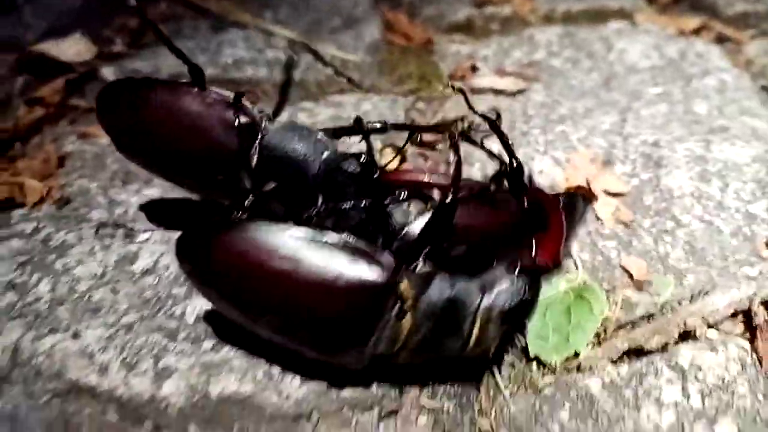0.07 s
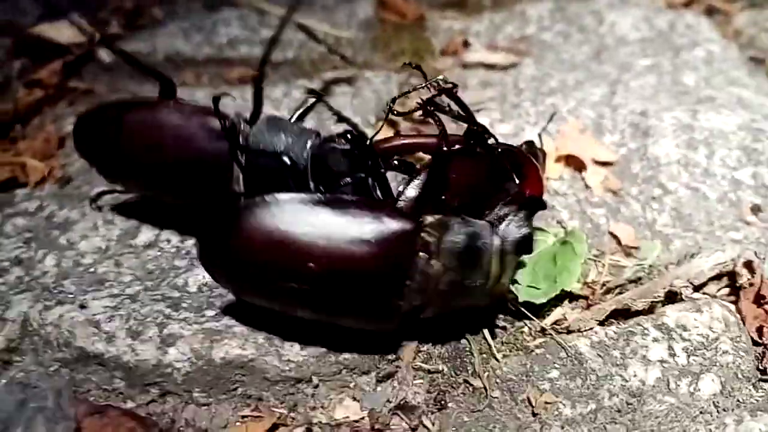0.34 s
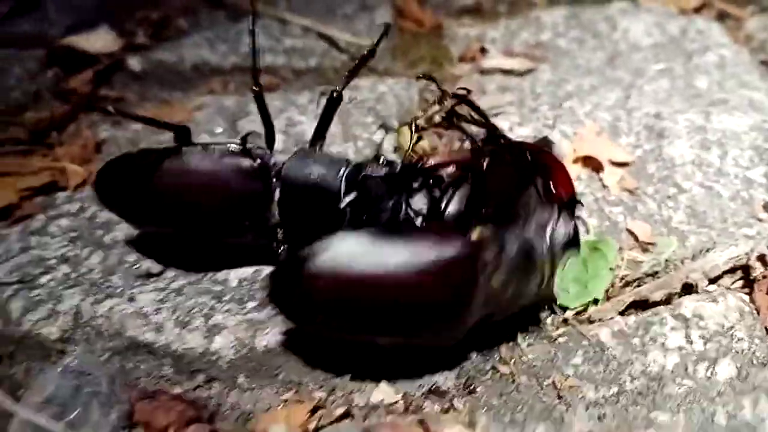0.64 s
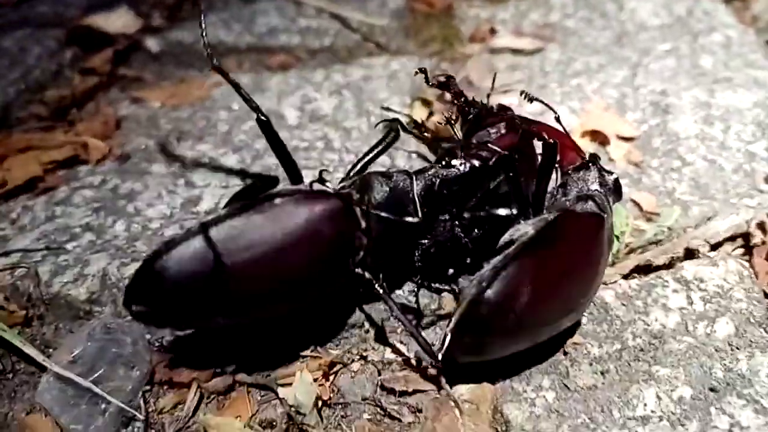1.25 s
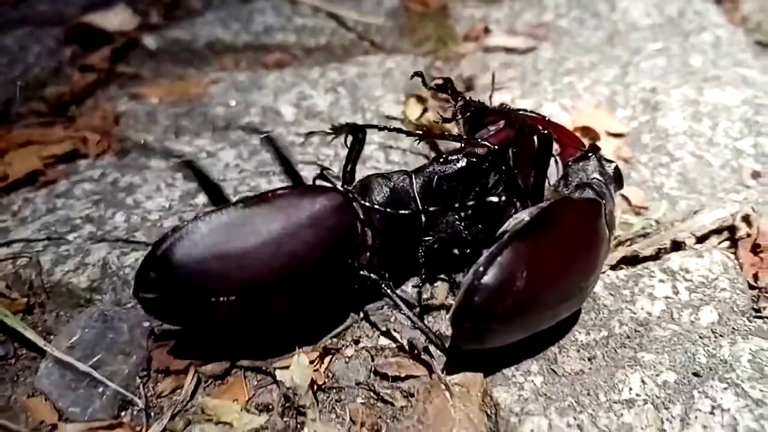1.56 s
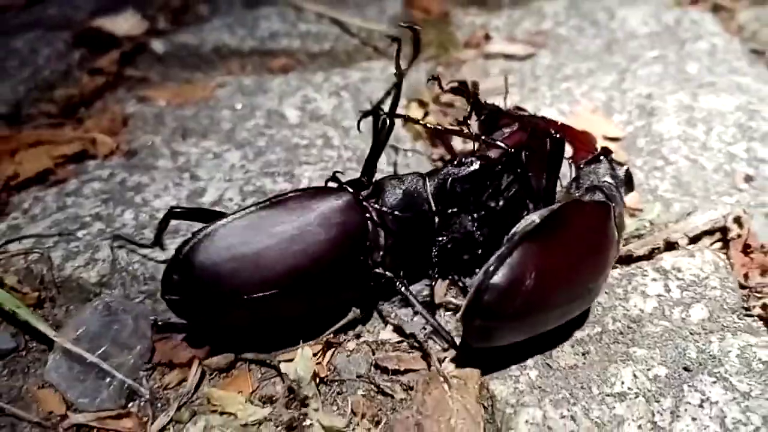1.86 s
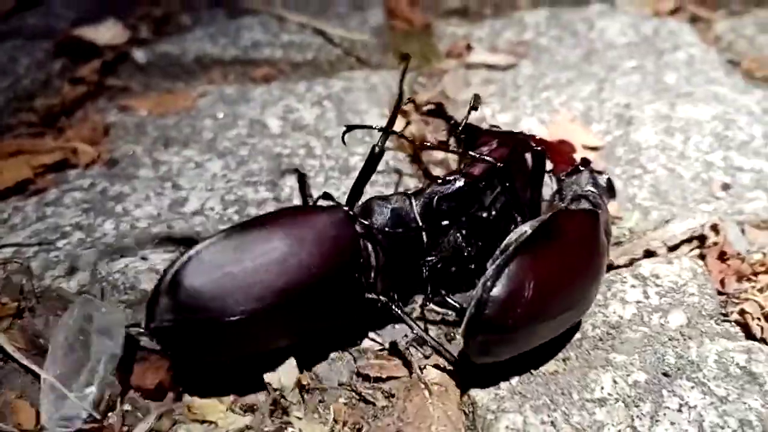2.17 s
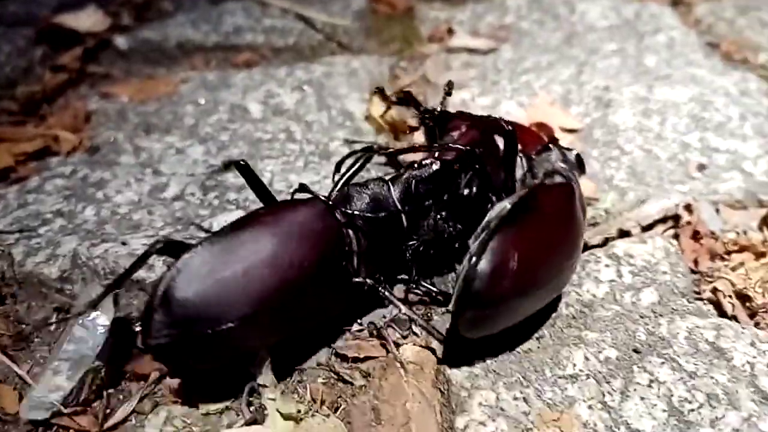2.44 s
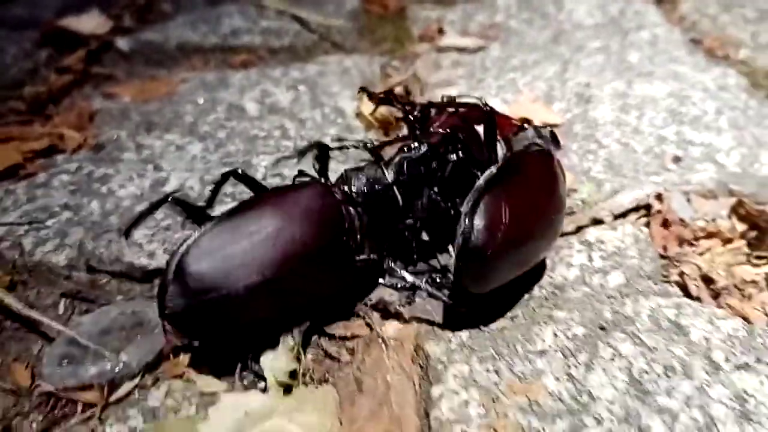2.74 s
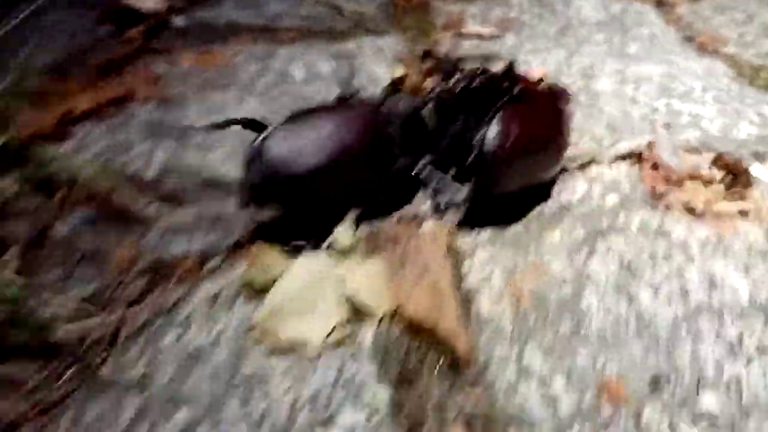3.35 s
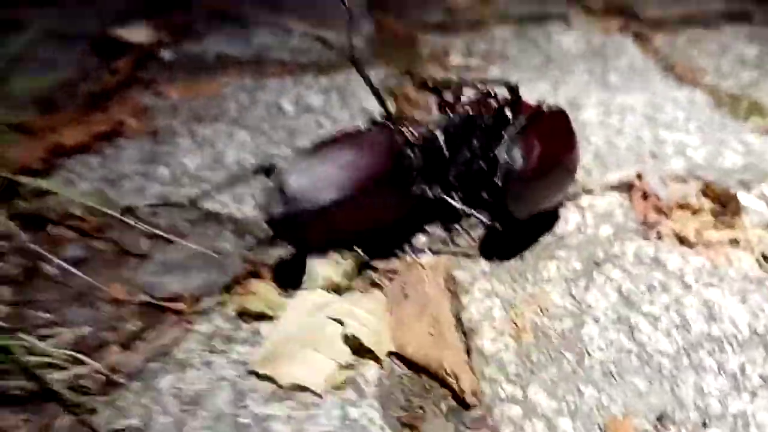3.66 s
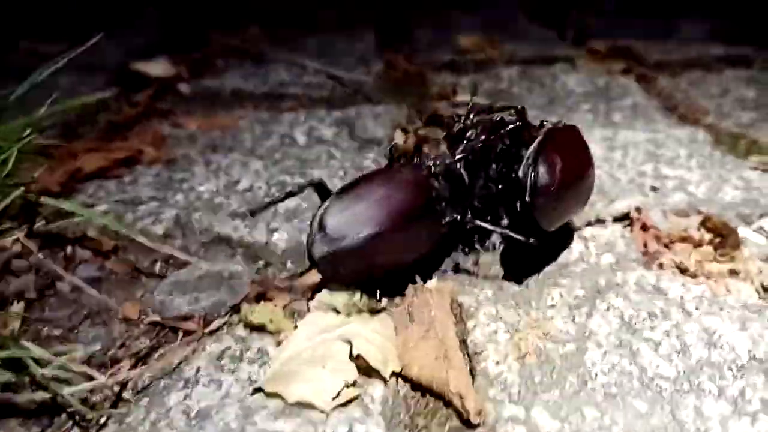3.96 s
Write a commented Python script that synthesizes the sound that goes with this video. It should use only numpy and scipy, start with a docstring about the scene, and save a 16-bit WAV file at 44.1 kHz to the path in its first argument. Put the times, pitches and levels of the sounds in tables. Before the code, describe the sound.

Dry, scratchy scraping of beetles scuffling on stone comes in uneven bursts with sharp ticks and dull knocks. It pauses, then returns harder and fades. The sound is very close and mostly on the right, over faint outdoor air.

```python
"""Dry handling sounds very near the right microphone, perhaps fingers on the recorder or beetles scuffling.
First come uneven scrapes, each a swarm of tiny slips, with sharp ticks, dull knocks and a hollow rub.
Near 2 seconds there is a lull. The fiercest burst starts around 3 seconds and dies down before the end.
All along, the right microphone's opening rings near 15 kHz with the contact, the left hears a duller
rustle, and both pick up faint outdoor air and light puffs of wind."""
import sys
import numpy as np
from scipy import signal
from scipy.fft import rfft, irfft
from scipy.io import wavfile
from scipy.ndimage import uniform_filter1d

SR = 44100
rng = np.random.default_rng(int(sys.argv[2]) if len(sys.argv) > 2 else 0)


def store_wav(level_fs):
    """Save 16-bit WAV to argv[1]."""
    pcm = np.round(np.clip(np.atleast_2d(level_fs), -1, 1) * 32767)
    wavfile.write(sys.argv[1], SR, pcm.T.astype(np.int16))


N = 176400  # 4 seconds

# How loud the scraping is. Each row: time in seconds, hiss level in dB, low rub level in dB.
SCRAPE_LEVELS = [(0.0, -52, -56.5), (0.18, -46.5, -51), (0.34, -64.5, -69), (0.38, -61, -66),
                 (0.4, -48.5, -59.5), (0.5, -52.5, -59.5), (0.52, -55, -57), (0.54, -44.5, -53.5),
                 (0.58, -50.5, -54.5), (0.7, -52.5, -53), (0.78, -54, -61), (0.825, -57.5, -59.5),
                 (0.84, -48, -53.5), (0.9, -49, -59), (0.93, -57.5, -57.5), (1.02, -66.5, -66.5),
                 (1.07, -59, -62.5), (1.14, -54, -56), (1.21, -54, -59), (1.24, -50.5, -57),
                 (1.28, -53, -60.5), (1.38, -55.5, -59), (1.41, -59, -63.5), (1.55, -51.5, -58),
                 (1.65, -55.5, -59.5), (1.67, -62, -64), (1.86, -72.5, -66), (1.93, -63, -71),
                 (2.02, -71, -68), (2.07, -60, -71), (2.09, -81, -66), (2.14, -62, -66),
                 (2.18, -80.5, -68.5), (2.29, -52.5, -57), (2.42, -51, -53), (2.52, -64, -62.5),
                 (2.55, -53, -56), (2.82, -48, -53.5), (2.85, -60, -62), (2.875, -47.5, -55),
                 (2.92, -46.5, -58), (2.97, -44.5, -53), (3.06, -43.5, -55.5), (3.09, -55, -64),
                 (3.13, -60, -64), (3.145, -44.5, -52), (3.175, -52.5, -63), (3.215, -48.5, -65),
                 (3.26, -41.5, -54), (3.29, -49, -62), (3.32, -53.5, -68), (3.365, -38, -49.5),
                 (3.405, -39, -54), (3.44, -40.5, -53), (3.48, -47, -59), (3.5, -42, -58),
                 (3.53, -44.5, -55), (3.62, -41, -55.5), (3.71, -48, -53), (3.745, -64.5, -62.5),
                 (3.79, -54, -58), (3.84, -73, -70), (3.88, -61, -60), (3.91, -68.5, -68),
                 (3.99, -57.5, -62)]
# How much the microphone's opening rings. Each row: time in seconds, level against the hiss in dB.
RING_LEVELS = [(0, -0.5), (0.53, 2.5), (0.66, -4), (1.35, 0.5), (1.9, -5.5), (2.92, -2.5), (3.04, -1),
               (3.14, 0), (3.24, 0), (3.4, -4), (3.49, -5), (3.57, 2), (3.8, -10)]
# Sharp ticks. Each row: time in seconds, then crack level, brightness, thud level, ring level in dB.
TICK_EVENTS = [(0.103, -41.5, -1, -54, -39), (0.164, -36.5, 4, -36, -32), (0.2855, -47.5, 1, -63, -47),
               (0.3604, -38.5, 2, -55, -38), (0.3656, -41, -1, -72, -40), (0.3953, -36.5, 0, -55, -36),
               (0.43, -43, 3, -43, -39), (0.4732, -39, 6, -48.5, -42), (0.5697, -41.5, -3, -55, -46),
               (0.7803, -42, 8, -56, -42), (1.2195, -35.5, -5, -45, -39), (1.2218, -43, -5, -45, -46),
               (1.2709, -33, -7.5, -56, -42), (1.455, -37, 0, -43, -43), (1.501, -53, -3, -56, -39),
               (1.6081, -42, -3, -69, -38), (1.899, -50.5, -2, -70, -66), (2.031, -49.5, -2, -70, -46),
               (2.12, -53, -3, -66, -50), (2.1487, -54, 2, -70, -56), (2.1947, -52.5, 0, -68, -49),
               (2.2691, -46, -6, -72, -52), (2.377, -42, 11, -46.5, -37), (2.7932, -33.5, -6.5, -43.5, -35),
               (2.8767, -36, 2.5, -54, -42), (2.97, -30.5, 4, -38.5, -36), (2.9806, -29, 3, -39, -36),
               (2.9967, -35, 5, -56, -31), (3.036, -37, 4, -58, -33), (3.0416, -32.5, 2, -60, -28),
               (3.1033, -34, -1, -39.5, -44), (3.12, -28, 15, -31.5, -27), (3.1741, -24, 5, -36.5, -28),
               (3.2021, -20, 13.5, -26.5, -29), (3.222, -30, 19, -35.5, -31), (3.229, -44, -1, -60, -22),
               (3.2587, -28.5, 7.5, -37.5, -35), (3.2882, -23, 21, -25, -24.5), (3.306, -40, 8, -57, -33),
               (3.3304, -29, 11, -42, -32), (3.3432, -27.5, 6, -34.5, -30), (3.3637, -33, 7, -49, -36),
               (3.3808, -33.5, 3, -58, -29), (3.386, -37, 1, -37.5, -29), (3.4015, -29.5, 1, -47, -35),
               (3.4072, -25, 7, -57, -30), (3.4609, -28, -6, -35.5, -32), (3.48, -32, 6, -59, -42),
               (3.5032, -28.5, 8, -48, -40), (3.5078, -30, 8, -57, -43), (3.5483, -34, 4, -59, -46),
               (3.5537, -32, -2, -42.5, -38), (3.5865, -38, 0, -42, -35), (3.608, -41, -2, -47, -33),
               (3.6211, -31, 1, -47, -34), (3.659, -38, 9, -49, -43), (3.7495, -48.5, 0, -70, -43),
               (3.7803, -42, 4, -44.5, -68), (3.873, -45.5, 2, -66, -58), (3.8832, -36.5, -0.5, -59, -31),
               (3.9594, -40.5, -4, -58, -44), (3.989, -45.5, 4, -54, -48)]
# Dull knocks. Each row: start in seconds, level in dB, pitch in Hz.
KNOCK_EVENTS = [(0.164, -31.5, 173), (0.1754, -40, 300), (0.4516, -41.5, 400), (0.6737, -38.5, 1160),
                (.7016, -31, 1110), (0.7328, -44.5, 1080), (0.8407, -40, 1260), (0.8818, -40, 730),
                (0.9017, -42, 400), (1.2204, -38, 720), (1.248, -41, 276), (1.2715, -42, 298),
                (1.454, -41, 388), (2.418, -40.5, 686), (2.7932, -35.5, 313), (2.839, -32, 404),
                (3.028, -39.5, 1650), (3.0584, -40.5, 1790), (3.202, -38.5, 135), (3.288, -28, 125)]
# The hollow rub. Each row: time in seconds, level in dB.
HOLLOW_LEVELS = [(0, -77), (.2, -70), (.33, -80), (.58, -62), (1.02, -82), (1.27, -59), (1.42, -63),
                 (1.57, -56.5), (1.75, -72.5), (2.3, -72.5), (2.45, -66), (4, -84)]
# The rustle on the left. Each row: time in seconds, hiss level in dB, low rub level in dB.
RUSTLE_LEVELS = [(0.0, -61, -60.5), (0.19, -61, -56), (0.29, -67.5, -66.5), (0.74, -60.5, -60),
                 (1.04, -73.5, -69), (1.51, -75, -73), (1.56, -63, -72), (1.85, -77, -71),
                 (1.92, -63.5, -75), (2.1, -78.5, -72.5), (2.99, -51.5, -67), (3.1, -60, -61),
                 (3.36, -55.5, -70), (3.63, -56.5, -64), (3.73, -70, -72), (3.99, -69.5, -66.5)]
# Puffs of wind. Each row: time in seconds, level in dB.
WIND_LEVELS = [(0.0, -87), (0.27, -77), (0.45, -98), (0.58, -75), (0.7, -99), (1.15, -84), (1.24, -77),
               (1.35, -88), (1.78, -73), (2.24, -85), (2.33, -70.5), (2.81, -80.5), (3.24, -91),
               (3.99, -79.5)]

# The tone of each sound, from low to high. Each row: frequency in Hz, relative strength in dB.
SOFT_HISS_TONE = [(1200, -23.5), (2200, -9), (3200, -2.5), (4800, -3), (6200, 4), (7600, 1.5), (8700, -1.5),
                  (9600, -2), (11000, -4.5), (12500, -11), (14000, -0.5), (16000, -31)]  # light scraping
HARD_HISS_TONE = [(1200, -19.5), (2200, -13.5), (3200, -4.5), (4800, -4), (6200, 1), (7600, 0.5),
                  (8700, -2.5), (9600, -0.5), (11000, -5), (12500, -8), (14000, -8), (16000, -43)]  # hard scraping
RUB_TONE = [(30, -29), (70, -9.5), (130, -0.5), (300, -1), (600, 1), (1200, -1), (1700, -3.5),
            (2400, -12.5), (4000, -29)]  # the low part of a scrape
RING_TONE = [(12500, -43), (14100, 1), (14700, 8), (15100, 5), (15450, 11), (15800, -6), (16400, -44),
             (17000, -46)]  # the right microphone's opening
CRACK_TONE = [(1500, -29), (2800, -14), (4500, -2), (7000, 6.5), (8600, 3), (9500, 3), (11300, -2),
              (13000, -9), (16000, -32)]  # the bright part of a tick
THUD_TONE = [(25, -28), (60, -6), (200, 0.5), (600, 1.5), (1500, -0.5), (3000, -7.5), (4200, -6.5),
             (5500, -18.5)]  # the low part of a tick
KNOCK_TONE = [(25, -30), (70, 0.5), (1650, -6), (2300, -19), (6000, -26)]  # a dull knock
HOLLOW_TONE = [(100, -24), (200, -7), (300, 0), (430, -2), (560, -15.5), (1000, -41)]  # the hollow rub
FAR_HISS_TONE = [(1500, -3), (2500, -3), (6500, 2.5), (8000, 3), (9800, -11.5), (13000, -25), (15000, -21),
                 (16500, -38)]  # the high part of the left rustle
FAR_RUB_TONE = [(100, -12), (250, 7), (500, -2.5), (750, 6), (1600, 5), (2300, -1.5), (4000, -22)]  # the low part of the left rustle
AIR_TONE = [(30, -12), (80, 10), (150, 5), (650, -6.5), (1050, 9.5), (1600, -1.5), (2500, -11), (6000, -20),
            (11000, -62)]  # outdoor air
WIND_TONE = [(20, -34), (45, -6), (80, -2), (135, 7.5), (180, -9.5), (500, -34)]  # wind on a microphone

SLIPS_PER_SECOND, SLIP_FADE_S, SLIP_SPREAD_DB = 1500, 0.00036, 5.5


def scraping():
    """Tiny slips make a hiss, a low rub and a ring in the microphone. Pressing harder adds grit."""
    grit_from_db, grit_per_db, hard_from_db = -47, 0.15, -49
    level = curve(SCRAPE_LEVELS)
    grain = slips(SLIP_SPREAD_DB + grit_per_db * np.maximum(level - grit_from_db, 0))
    hard = np.clip((level - hard_from_db) / 0.5, 0, 1)  # 0 for a light scrape, 1 for a hard one
    friction = grain * patchy_noise()
    hiss = (1 - hard) * colour(friction, SOFT_HISS_TONE) + hard * colour(friction, HARD_HISS_TONE)
    smoother_grain = grain ** 0.41
    rub = colour(smoother_grain * patchy_noise() * flutter(db=2, hz=67), RUB_TONE)
    ring = colour(grain * patchy_noise() * flutter(db=2.5, hz=120), RING_TONE)
    return (hiss * gain(level + 2)
            + rub * gain(curve(SCRAPE_LEVELS, column=2) - 0.5)
            + ring * gain(level + curve(RING_LEVELS)))


def slips(spread_db):
    """The jumpy loudness of many tiny slips, most small and a few large, over smooth sliding."""
    smooth_share = 0.2
    sizes = gain(spread_db * np.minimum(rng.exponential(1, N), 3.38))  # capped so none is huge
    slipping = rng.random(N) < SLIPS_PER_SECOND / SR
    t = np.arange(-200, 201) / SR
    one_slip = np.exp(-2 * abs(t) / SLIP_FADE_S)
    power = abs(signal.oaconvolve((sizes * slipping) ** 2, one_slip, "same"))
    power /= abs(uniform_filter1d(power, size=2600)) + 1e-9  # keep the average steady
    return np.sqrt(smooth_share + (1 - smooth_share) * power)


def patchy_noise():
    """Each moment of contact has its own tone: noise with random louder and softer patches."""
    patch_db = 2.4
    grid = signal.stft(noise(), nperseg=512)[2]  # the noise split up by frequency and time
    patches = uniform_filter1d(rng.standard_normal(grid.shape), size=4, axis=0)
    patches = uniform_filter1d(patches, size=4, axis=1)
    grid = grid * gain(patch_db * normalise(patches))
    return normalise(signal.istft(grid, nperseg=512)[1][:N])


def ticks():
    """Something catches and lets go: a burst about a millisecond long that cracks, thuds and rings."""
    rise_s, fall_s, tail_s, tail_db = 0.00025, 0.00019, 0.0015, -11
    out, t = np.zeros(N), np.arange(-1024, 1024) / SR
    burst = np.exp(-np.where(t < 0, -t / rise_s, t / fall_s))
    tail = gain(tail_db) * np.exp(-abs(t) / tail_s) * (t > 0)
    for time_s, crack_db, bright_db, thud_db, ring_db in TICK_EVENTS:
        bursts = rng.standard_normal((3, len(t))) * (burst + tail)
        crack = gain(crack_db + 1) * colour(bursts[0], CRACK_TONE, bright_db)
        thud = gain(thud_db - 3.5) * colour(bursts[1], THUD_TONE)
        ring = gain(ring_db + 0.5) * colour(bursts[2], RING_TONE)
        place(out, time_s, crack + thud + ring)
    return out


def knocks():
    """Dull knocks: each is a sudden push that dies away after one or two vibrations."""
    rise_cycles, fall_cycles = 0.13, 0.41
    out, t = np.zeros(N), np.arange(-2048, 2048) / SR
    for start_s, db, hz in KNOCK_EVENTS:
        cycles = hz * np.maximum(t, 0)
        loudness = (1 - np.exp(-cycles / rise_cycles)) * np.exp(-cycles / fall_cycles)
        push = np.cos(2 * np.pi * cycles) * loudness
        place(out, start_s, gain(db - 3.5) * colour(push, KNOCK_TONE))
    return out


def hollow_rub():
    """A hollow, stuttering rub: low noise whose loudness wobbles quickly."""
    return colour(noise() * flutter(db=4.6, hz=44.3), HOLLOW_TONE) * gain(curve(HOLLOW_LEVELS))


def far_rustle():
    """Tiny slips as the left microphone hears them: a duller, fainter hiss and rub."""
    grain = slips(SLIP_SPREAD_DB)
    hiss = colour(grain * noise(), FAR_HISS_TONE) * gain(curve(RUSTLE_LEVELS) - 2.5)
    rub = colour(grain ** 0.26 * noise(), FAR_RUB_TONE) * gain(curve(RUSTLE_LEVELS, column=2) - 6)
    return hiss + rub


def outdoors():
    """Faint steady air and lumpy puffs of wind, different at each microphone."""
    air_db, wind_boost_db = (-77, -69), (3, 7.5)  # left, right
    air = [colour(noise(), AIR_TONE) * gain(db) for db in air_db]
    wind = [colour(noise() * flutter(db=2.7, hz=29), WIND_TONE) * gain(curve(WIND_LEVELS) + db)
            for db in wind_boost_db]
    return np.array(air) + np.array(wind)


def gain(db):
    """Turns decibels into a number to multiply a sound by."""
    return 10 ** (np.asarray(db) / 20)


def normalise(x):
    """Scales a signal so its average power is 1."""
    return x / np.sqrt(np.mean(x ** 2) + 1e-20)


def curve(table, column=1):
    """Joins a table's points with straight lines, giving a value for every sample."""
    rows = np.array(table, float)
    return np.interp(np.arange(N) / SR, rows[:, 0], rows[:, column])


def noise():
    """White noise: an even hiss."""
    return rng.standard_normal(N)


def flutter(db, hz):
    """A random wobble in loudness: db sets how deep it is, hz roughly how fast it can move."""
    keep_slow = np.exp(-(np.fft.rfftfreq(N, 1 / SR) / hz) ** 2)
    wobble = irfft(rfft(noise()) * keep_slow, N)
    return gain(db * normalise(wobble))


def colour(x, tone, tilt_db=0):
    """Gives a sound a tone, at average power 1. The tilt favours the treble above 8.5 kHz."""
    hz = np.fft.rfftfreq(len(x), 1 / SR)
    tone_hz, tone_db = np.transpose(tone)
    shape_db = np.interp(np.log(hz + 1), np.log(tone_hz), tone_db)
    strength = gain(shape_db + tilt_db * np.clip((hz - 8500) / 2000, -.5, .5))
    # Delay each frequency so that ringing comes after a hit, never before it.
    cepstrum = irfft(np.log(strength), len(x))
    phase = rfft(2 * cepstrum[:len(x) // 2], len(x)).imag
    return normalise(irfft(rfft(x) * strength * np.exp(1j * phase), len(x)))


def place(mix, time_s, sound):
    """Adds a short sound centred on a time, with the energy its level would give over span_s."""
    span_s = 0.003
    start = round(time_s * SR) - len(sound) // 2
    part = mix[max(start, 0):start + len(sound)]
    part += sound[max(-start, 0):][:len(part)] * np.sqrt(span_s * SR / len(sound))


def scene():
    """Contact sounds on the right, a muffled trace of them on the left, air and wind on both."""
    leak_db, leak_cutoff_hz = -28, 6400
    contact = scraping() + hollow_rub() + ticks() + knocks()
    muffled = signal.lfilter(*signal.butter(2, leak_cutoff_hz, fs=SR), contact)
    left = far_rustle() + gain(leak_db) * muffled
    return np.array([left, contact]) + outdoors()


def record(dry):
    """The recorder cuts off the very highest treble."""
    cutoff_hz = 16800
    treble_cut = signal.firwin(511, cutoff_hz, window=("kaiser", 9), fs=SR)
    return signal.oaconvolve(dry, treble_cut[None], "same")


dry = scene()
out = record(dry)
store_wav(out)
```